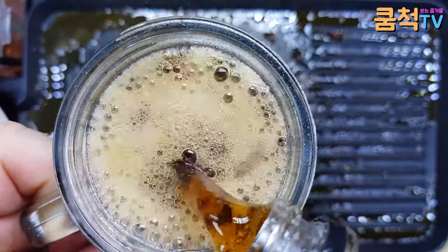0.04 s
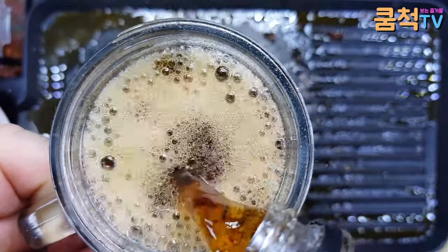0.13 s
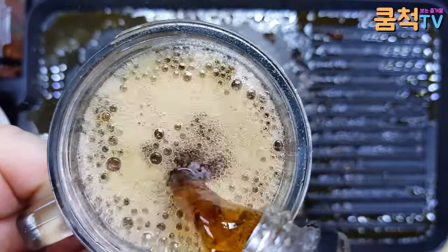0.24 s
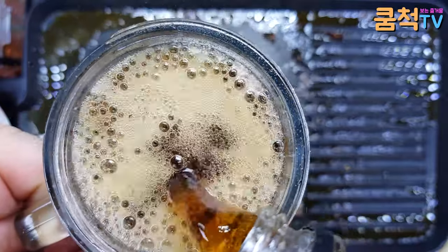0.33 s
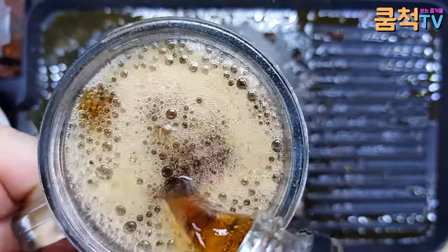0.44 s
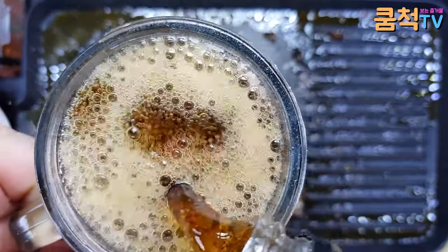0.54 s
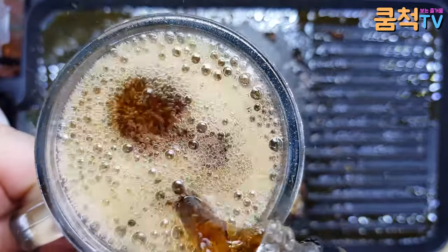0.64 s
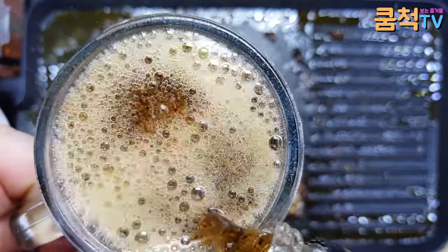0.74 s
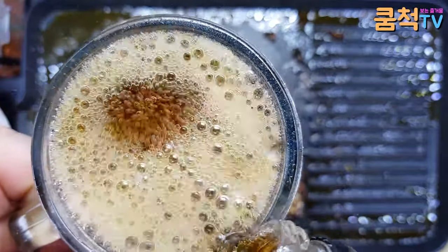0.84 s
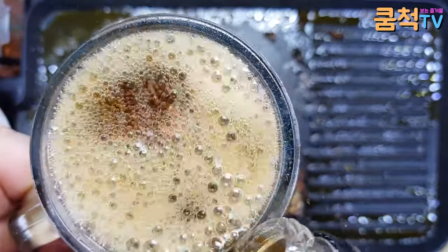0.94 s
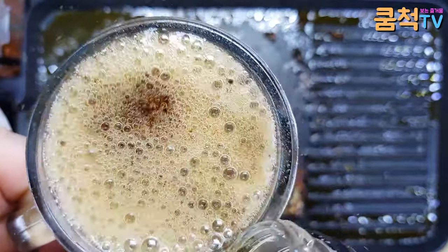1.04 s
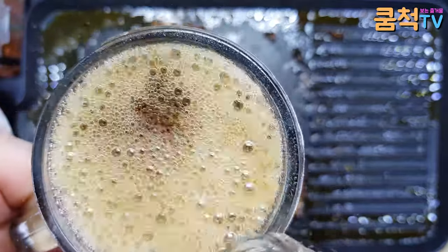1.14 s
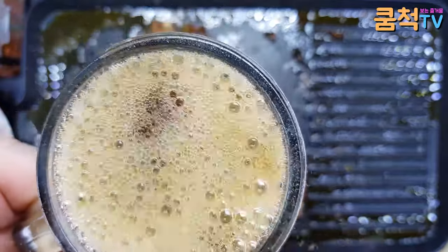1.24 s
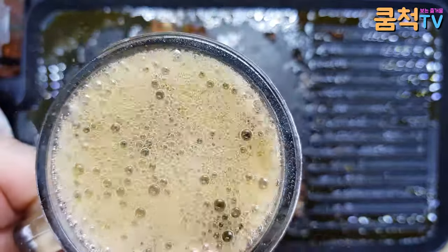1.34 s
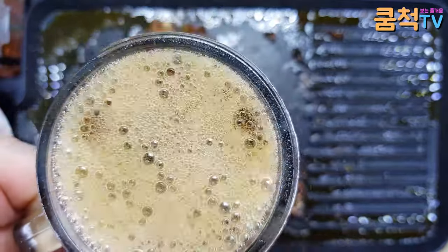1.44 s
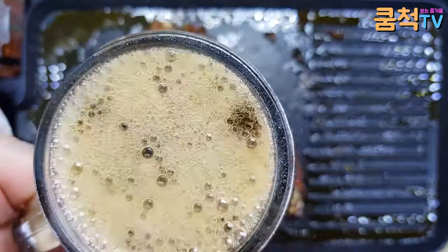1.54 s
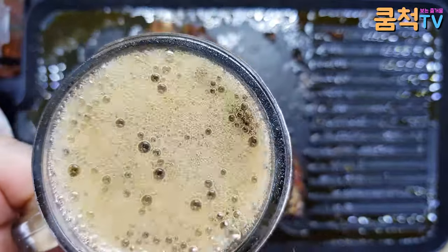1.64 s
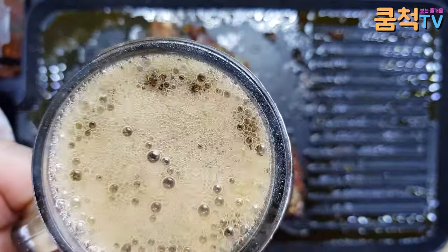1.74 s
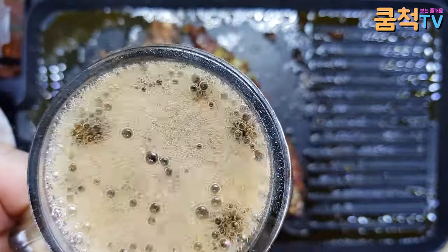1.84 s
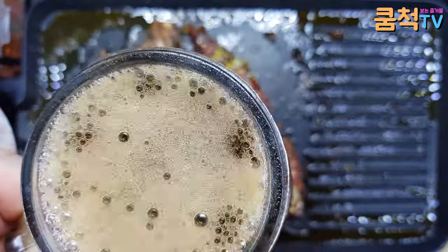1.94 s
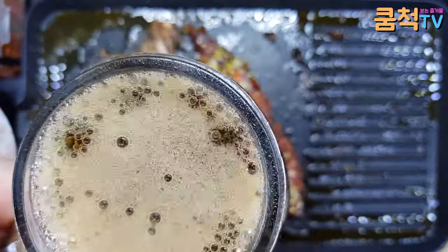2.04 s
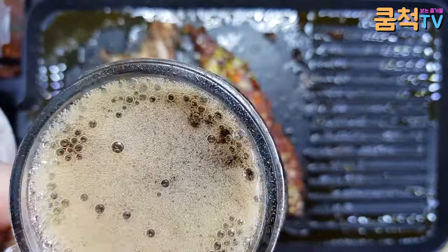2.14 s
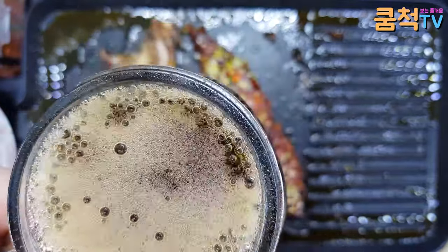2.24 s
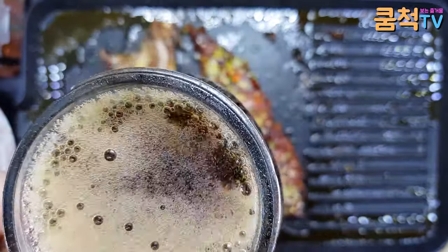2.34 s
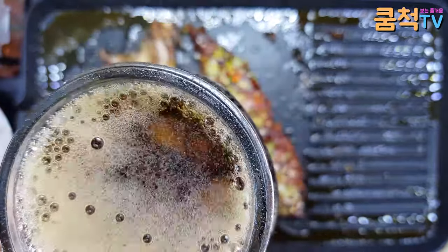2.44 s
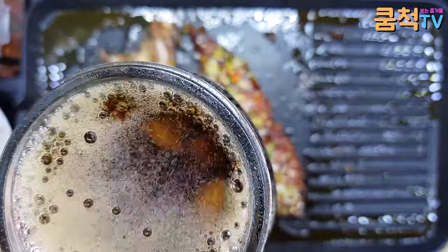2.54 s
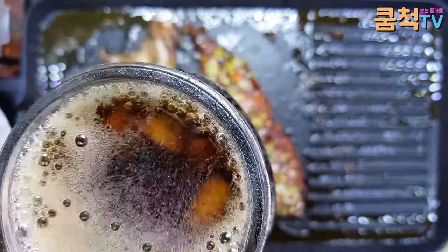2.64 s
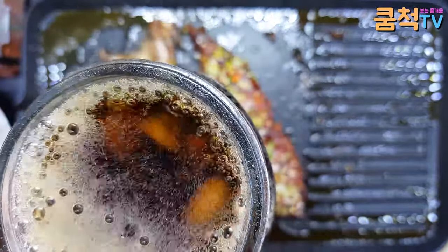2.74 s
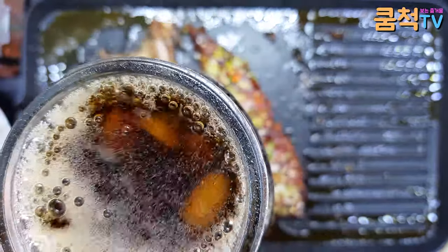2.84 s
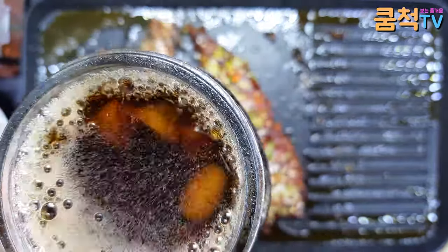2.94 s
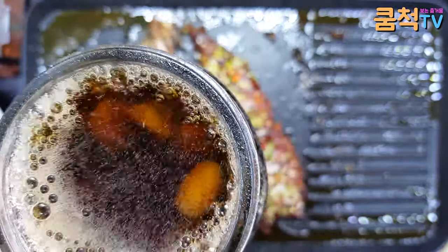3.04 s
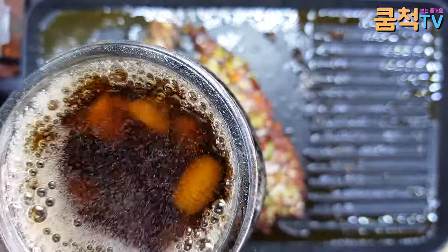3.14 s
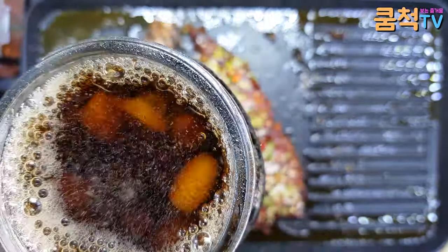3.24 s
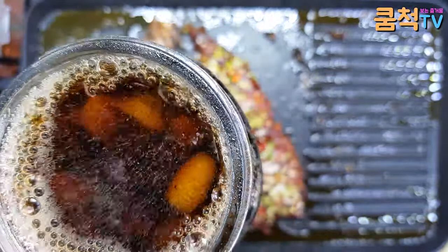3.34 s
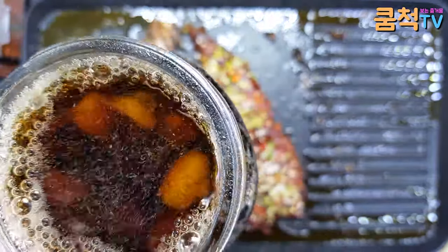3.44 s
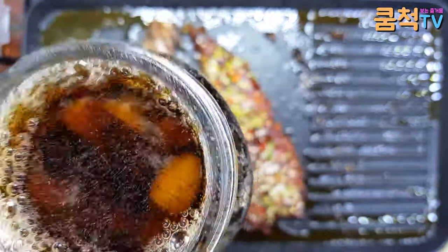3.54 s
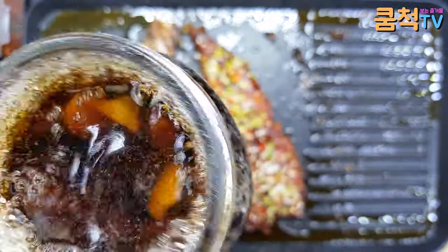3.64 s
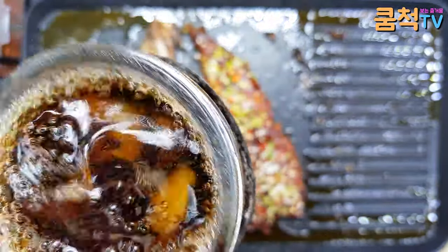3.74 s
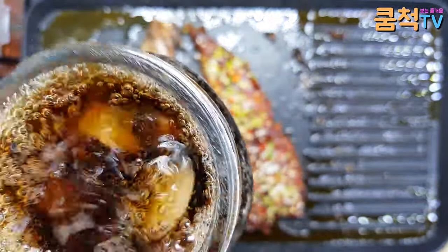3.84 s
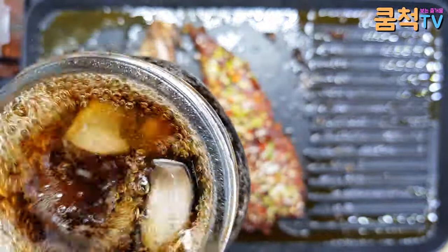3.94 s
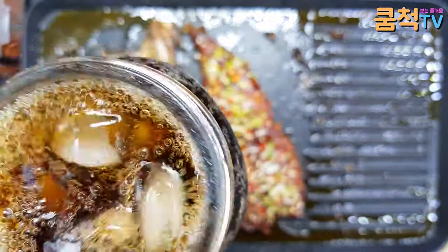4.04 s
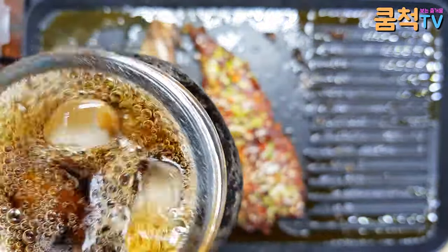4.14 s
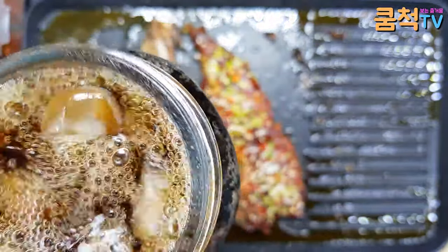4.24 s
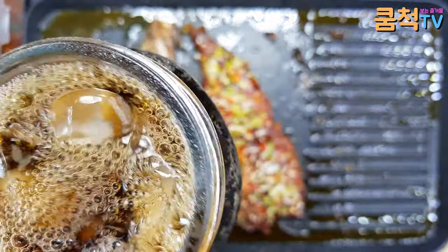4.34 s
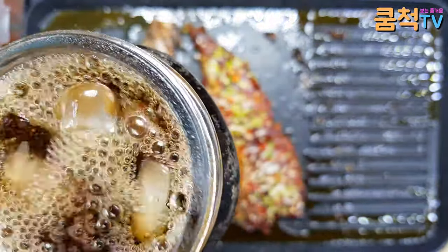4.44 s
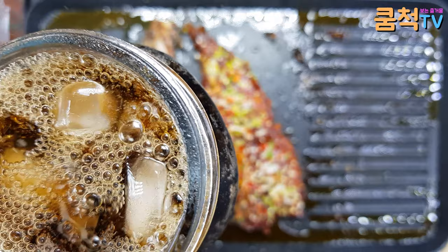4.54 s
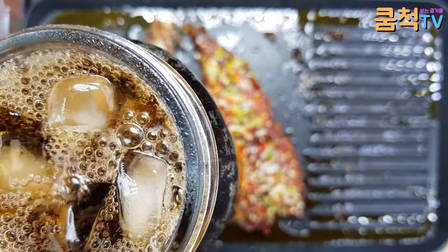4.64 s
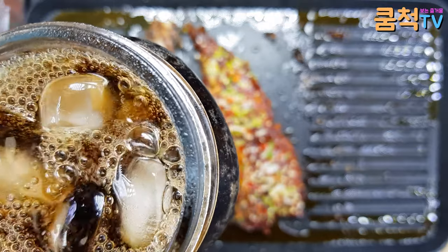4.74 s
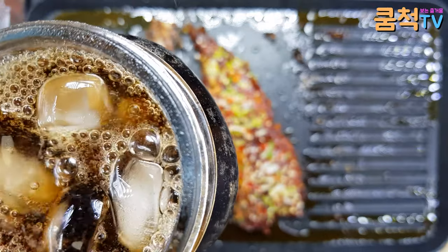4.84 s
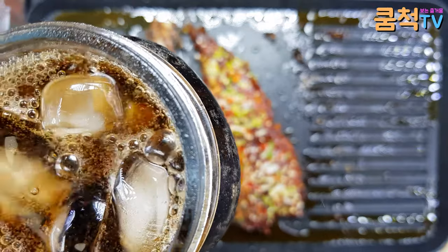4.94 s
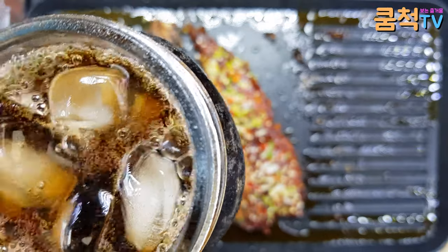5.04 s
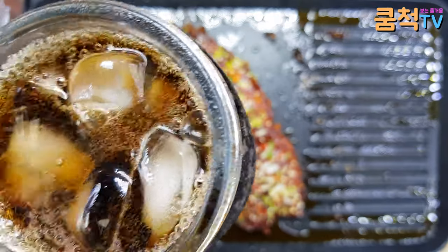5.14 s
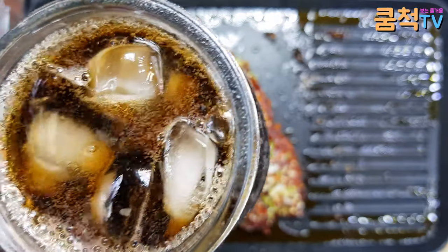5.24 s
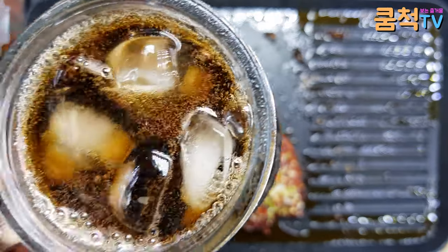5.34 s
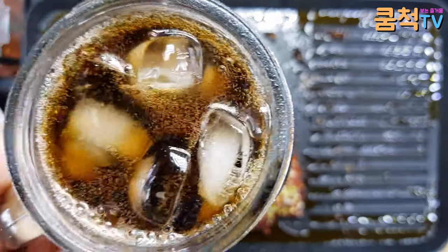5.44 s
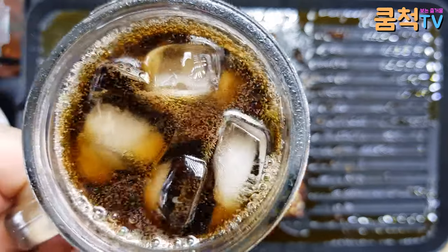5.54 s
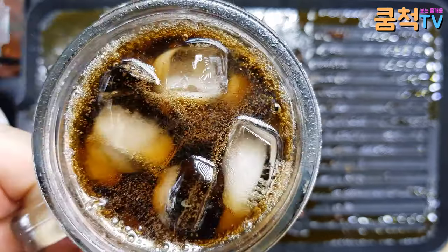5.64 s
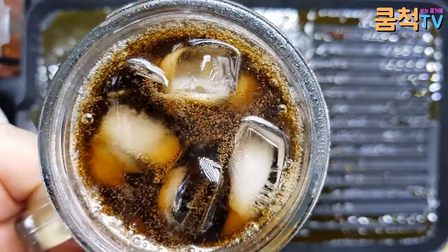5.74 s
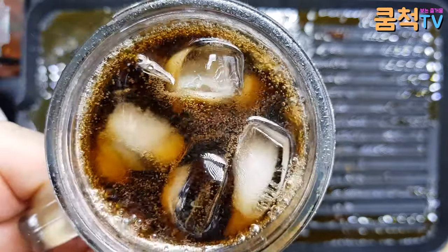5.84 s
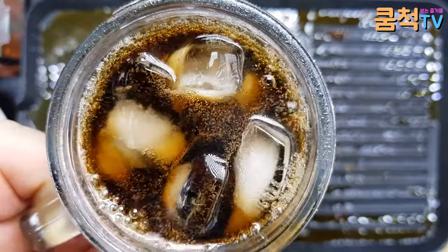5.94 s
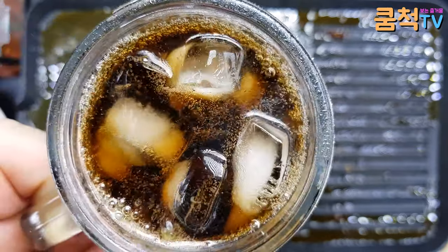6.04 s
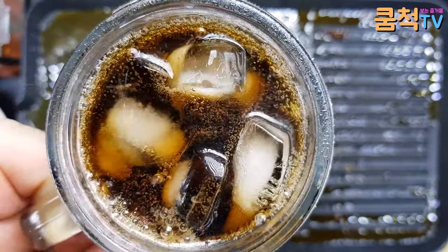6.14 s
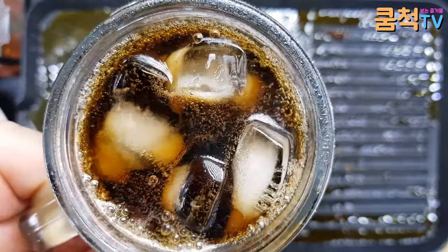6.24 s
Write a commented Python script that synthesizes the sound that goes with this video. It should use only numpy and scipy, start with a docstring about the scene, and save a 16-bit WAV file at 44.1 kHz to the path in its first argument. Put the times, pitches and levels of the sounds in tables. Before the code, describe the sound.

Fizzy soda foam hisses close up, a bottle knocks the glass rim, then a second pour gurgles and splashes while fat sizzles on a grill behind.

```python
"""Soda foams in a glass of ice close to the microphone: dense fields of bubbles over noise, tuned by the air column.
A second pour gurgles in later as noise in the hollows of the drink and ringing bubbles.
The emptied plastic bottle knocks the rim three times, ringing its air and its wall; dull thuds follow.
Behind it fat sizzles and spits on a grill, noise with sharp clicks and puffs.
Farthest back lies the low hum of the room: wavering tones over a rumble."""
import sys
import numpy as np
from scipy import signal
from scipy.fft import rfft, irfft, next_fast_len
from scipy.io import wavfile
from scipy.ndimage import uniform_filter1d, map_coordinates

SR = 44100
rng = np.random.default_rng(int(sys.argv[2]) if len(sys.argv) > 2 else 0)


def wrap_up_sound(samples):
    """Save the sound to the file named by the first command line argument, as 16-bit audio."""
    columns = np.atleast_2d(samples).T
    # keep every value between -1 and 1, then stretch to whole-number steps
    tamed = np.clip(columns, -1, 1)
    steps = np.round(tamed * 32767).astype(np.int16)
    wavfile.write(sys.argv[1], SR, steps)


N = 277389
T = np.arange(N) / SR

# All levels below are settings; flutter, fades and filters act on top of them.
# Spectrum of the foam: [f/Hz, relative level/dB per Hz]
FOAM_SPECTRUM = [(530, -23.5), (900, -18.5), (1980, -7), (2210, -11), (2460, -4), (3860, 1), (13600, -31.5),
                 (16000, -47)]
# The foam swells after each pour and collapses: [t/s, level/dB]
FOAM_LEVEL = [(0, -37), (.45, -38), (1.15, -40.5), (1.7, -38.5), (2.15, -36.5), (2.5, -42), (2.9, -46.5),
              (3.4, -58), (4.05, -51), (4.15, -39), (4.45, -45.5), (4.75, -60), (6.29, -65)]
# The smallest bubbles, ticking in the top octave: [t/s, level/dB]
TICK_LEVEL = [(0, -49), (1.22, -58), (1.3, -45.5), (1.9, -46.5), (2.2, -56), (2.7, -51), (3.6, -55),
              (4.3, -59), (5.6, -55), (5.85, -67.5), (6.25, -54)]
# Lift, or dip, at the resonance of the air above the drink: [t/s, lift/dB]
COLUMN_LIFT = [(0, -0.5), (1.1, -0.5), (2.1, 2.5), (2.7, 5.5), (3.2, -4), (4.2, 5.5), (5.15, 4), (5.4, -5)]
# The second pour: [t/s, gurgle level/dB, splash level/dB]
POUR_LEVELS = [(3.56, -79, -56), (3.65, -37, -40), (3.75, -46, -48.5), (4.04, -46, -41.5),
               (4.12, -39, -39.5), (4.43, -46.5, -47.5), (4.5, -48, -49)]
# Hollows of the drink among the ice: [f/Hz, width/Hz, level/dB]
HOLLOWS = [(505, 35, 1.5), (724, 107, 3.5), (1316, 100, 2), (190, 27, 7.5), (2030, 1300, -12)]
# Single clear bubbles of the second pour, small high ones and deep gulps: [t/s, level/dB, f/Hz]
PLINKS = [(3.646, -28, 750), (3.646, -24, 2840), (3.688, -15, 2940), (3.688, -20, 1170), (3.718, -22, 1190),
          (3.723, -20.5, 2870), (3.8151, -15, 2470), (3.8847, -19.5, 2730), (3.897, -25, 740),
          (3.936, -22.5, 2580), (3.8955, -26, 2800), (4.04, -25.5, 2520), (4.099, -19, 1490),
          (4.199, -22, 1140), (4.264, -23, 2960), (4.2558, -11.5, 2950), (4.289, -21, 1280),
          (4.29, -14.5, 3700), (4.3182, -16.5, 3150), (4.32, -29.5, 800), (4.384, -12, 2760),
          (4.384, -21, 1240), (4.445, -24, 3730), (4.442, -26, 1130)]
# Bottle against the rim, the first blow with a rebound:
# [t/s, blow level/dB, air ring level/dB, wall ring level/dB, wall f/Hz, wall glide/(Hz per s)]
KNOCKS = [(0.6736, -11.5, -13.5, -23.5, 965, -40), (.681, 0.5, -17, -44.5, 983, -40),
          (0.8261, -13, -21, -40.5, 953, -250), (1.043, -14.5, -33.5, -40, 980, 895)]
# Modes of the bottle wall: [multiple of the wall pitch, level/dB, time to fall 60 dB/s]
WALL_MODES = [(1, 3, 0.2), (1.9, -2.5, 0.15), (.55, 2.5, 0.021), (1.58, 9, 0.017), (4.05, 8.5, 0.023),
              (4.8, 7, 0.011), (6.3, -5, 0.017)]
# Glass and hand shift: [t/s, level before the fade/dB, f/Hz]
THUDS = [(3.265, -33, 119), (3.9, -36.5, 88), (4.384, -32, 62.5)]
# Single bursts of spitting fat and foam: [t/s, peak level/dB, f/Hz]
POPS = [(0.3347, -14.5, 4700), (.6288, -19.5, 4000), (0.7125, -16.5, 2780), (0.75, -18.5, 4070),
        (.9481, -22.5, 2800), (1.0269, -20.5, 2050), (1.282, -16.5, 3700), (1.466, -14.5, 4600),
        (1.6007, -21, 3380), (1.7398, -16.5, 4660), (1.8308, -18, 3730), (2.033, -25, 2430),
        (2.5412, -9, 3600), (2.6437, -11.5, 3570), (2.728, -20, 2680), (2.868, -25.5, 3430),
        (2.921, -21.5, 3450), (2.9877, -24, 7300), (3.007, -18, 5430), (3.1395, -24, 8500),
        (3.1802, -13, 3830), (3.1968, -21, 5500), (3.208, -16.5, 5510), (3.2464, -18, 2730),
        (3.2878, -18, 5960), (3.313, -22.5, 2730), (3.364, -16, 3460), (3.4627, -24.5, 2580),
        (3.56, -12.5, 3200), (3.5674, -11.5, 2840), (3.6673, -14, 3170), (3.6968, -13.5, 2800),
        (4.0991, -2.5, 5440), (4.1058, -18, 3760), (4.1516, -14.5, 3470), (4.4092, -12.5, 2520),
        (4.5475, -15.5, 5850), (4.5993, -13, 3160), (4.8805, -20.5, 4540), (5.0306, -17, 5230),
        (5.1276, -19, 3530), (5.2169, -18, 2820), (5.2517, -19.5, 5330), (5.3163, -23, 4400),
        (5.3376, -14.5, 2900), (5.5981, -17, 5950), (5.701, -15, 5030), (5.7159, -20, 6860),
        (5.9936, -15, 4900), (6.2619, -23, 2520)]
# Spectrum of the grill: [f/Hz, relative level/dB per Hz]
SIZZLE_SPECTRUM = [(180, -42), (300, -2), (405, -28), (681, -5), (1020, -21.5), (2470, 0.5), (6630, 4.5),
                   (11100, -10), (15300, -63)]
# Course of the grill: [t/s, level/dB]
SIZZLE_LEVEL = [(0, -44), (.5, -42.5), (2.5, -39.5), (3.4, -43.5), (4.1, -43), (4.6, -40.5), (5.2, -43.5),
                (5.8, -46), (6.29, -45)]
# Short hisses of steam squeezing out under the meat: [t/s, level before the fade/dB, f/Hz]
SQUEAKS = [(0.268, -29, 5000), (1.383, -29, 5960), (1.975, -32, 5940), (3.195, -21.5, 5460),
           (3.581, -21.5, 6000), (5.93, -34, 4640), (6.085, -28.5, 5670), (6.105, -26.5, 6100)]
# Spectrum of the room's rumble: [f/Hz, relative level/dB per Hz]
RUMBLE_SPECTRUM = [(20, -50), (34, 7), (91, -13), (124, -14), (200, -16.5), (304, -26.5), (1200, -27.5),
                   (1560, -24), (2640, -120)]
# Tones of the fan: [f/Hz, mean rms level/dB, size of the pitch waver/Hz]
HUM_TONES = [(38.7, -47, 1.13), (116.2, -56, 0.49), (60.1, -53.5, 1.33), (76.5, -55.5, 2.52)]

# Centre of the seething; it is 1 dB down SEETHE_FALL_S away, 4 dB at twice that
SEETHE_S, SEETHE_FALL_S = 2.11, .11
# The air above the drink rings with the fizz; its pitch climbs over FILL_S as the second pour fills the glass
COLUMN_HZ, FILLED_HZ, FILL_S = 3660, 4650, (3.1, 4.5)
# The lower ring is stronger while the first stream still runs
LOW_LIFT_DB, POUR_ENDS_S = 10, 1.0
# All plinks ring about equally long: time to fall 26 dB
PLINK_LIFE_S = 0.005
# The bottle's air note at the first knock; it rises as the neck clears
AIR_HZ, AIR_RISE_HZ_PER_S = 186.4, 103
THUD_T60_S = 0.31
# Resonance width at 6 kHz; higher squeaks are broader
SQUEAK_T60_S, SQUEAK_WIDTH_HZ, WIDER_PER_OCTAVE = 0.046, 1140, 6.5
TOP_HZ = 16000


def foam(surge):
    """Soda foam: noise and a dense field of tiny bursting bubbles, with one brief bright seething."""
    level_db, = curves(FOAM_LEVEL)
    bursts = crackle(count=5000, spread_db=4, life=.0006)
    bed = coloured(rng.standard_normal(N) + .7 * bursts, FOAM_SPECTRUM)
    fizz = bubbles(count=9000, hz=4000, octaves=.4, cycles=7, spread_db=3, size=200)
    head = amp(level_db + 0.29 * surge + 0.67 * wobble(40.08)) * (bed + 0.21 * fizz)
    # as the head of foam breaks up it seethes brightly for a moment
    seethe_db = -41.0 - ((T - SEETHE_S) / SEETHE_FALL_S) ** 2
    seethe = bubbles(count=20000, hz=4780, octaves=0.21, cycles=5.2, spread_db=1.5, size=96)
    return head + amp(seethe_db) * seethe


def ticks():
    """The smallest bubbles tick in clumps in the top octave, over a thin hiss."""
    level_db, = curves(TICK_LEVEL)
    field = bubbles(count=2500, hz=12500, octaves=.3, cycles=4, spread_db=6, size=64)
    clumps = field * amp(3.5 * wobble(18))
    thin = coloured(rng.standard_normal(N), [(8000, -14), (11500, -2.5), (14500, -3.5), (16200, -12)])
    return amp(level_db) * (0.37 * unit(clumps) + 0.2 * thin)


def air_column(x):
    """Air above the drink lifts or dips x at its moving resonance and at the one below it."""
    f, t, z = signal.stft(x, SR, nperseg=512)
    column_hz = np.interp(t, FILL_S, (COLUMN_HZ, FILLED_HZ))
    octaves = np.log2((f[:, None] + 1) / column_hz)
    lift_db = np.interp(t, *np.transpose(COLUMN_LIFT))
    low_db = 0.3 * lift_db + LOW_LIFT_DB / (1 + np.exp((t - POUR_ENDS_S) / 0.33))
    main_lift = lift_db * np.exp(-(octaves / 0.15) ** 2)
    low_lift = low_db * np.exp(-((octaves + 0.84) / 0.05) ** 2)
    return signal.istft(z * amp(main_lift + low_lift), SR, nperseg=512)[1][:N]


def pour():
    """The stream slaps unevenly into the hollows between the ice, traps bubbles there and splashes in small ones."""
    gurgle_db, splash_db = curves(POUR_LEVELS, left=-120, right=-120)
    slaps = unit(filtered(crackle(count=1800, spread_db=7, life=0.0017), hollows))
    large = bubbles(count=1600, hz=882, octaves=0.43, cycles=7.8, spread_db=7.0, size=900)
    small = bubbles(count=5000, hz=2920, octaves=0.29, cycles=6.7, spread_db=12.0, size=600)
    churn = coloured(crackle(count=1500, spread_db=6, life=0.0035),
                     [(1500, -34), (2500, 2.0), (3200, -1), (4500, -26), (7000, -30)])
    gurgle = amp(gurgle_db) * (0.78 * slaps + 0.5 * large)
    splash = amp(splash_db) * (small + 0.9 * churn)
    # foam over the drink swallows the top
    return low_passed(gurgle + splash + plinks(), 5500)


def plinks():
    """Each clear bubble is born in a slap of liquid and shivers while it rings."""
    s, db, hz = columns(PLINKS)
    size = 2048
    noise = uniform_filter1d(rng.standard_normal((len(PLINKS), 2, size)), size=4).swapaxes(0, 1)
    birth, shiver = noise
    slap = 1.6 * np.diff(uniform_filter1d(birth, size=3), prepend=0)
    slap = slap * np.exp(-np.arange(size) / (0.00083 * SR))
    ring = rings(hz, hz * PLINK_LIFE_S, size=size) * (1 + 0.44 * shiver)
    return placed(s[:, 0], amp(db) * (ring + slap))


def hollows(f):
    """Response of the drink's low resonances together, with alternating sign."""
    return sum((-1) ** k * amp(db) * resonance(f, hz, width) for k, (hz, width, db) in enumerate(HOLLOWS))


def bottle():
    """Knocks on the rim ring the air in the bottle (a long low note) and its stiff wall."""
    first_s, first_db = KNOCKS[0][:2]
    air_turns = np.cumsum(AIR_HZ + AIR_RISE_HZ_PER_S * (T - first_s)) / SR
    out, t = np.zeros(N), np.arange(SR // 2) / SR
    for s, db, air_db, wall_db, hz, glide in KNOCKS:
        i = round(s * SR)
        turns = air_turns[i:i + len(t)] - air_turns[i]
        air_fade = amp(air_db - 60 * t / 0.37) * (1 + 0.46 * np.exp(-t / 0.0044))
        air = air_fade * (1 - np.exp(-t / 0.0027)) * np.sin(2 * np.pi * turns)
        wall = np.zeros(len(t))
        for k, level, t60 in WALL_MODES:
            # softer blows wake less of the upper modes
            mode_db = wall_db + level + 0.63 * (db - first_db) * np.log2(k)
            wall += amp(mode_db - 60 * t / t60) * np.sin(2 * np.pi * k * (hz + glide * t / 2) * t)
        # the contact: one swing, harder with the wall ring, then a dull rattle falling 60 dB in 45 ms
        crack = np.sin(2 * np.pi * 3900 * t) * np.exp(-t / 0.00008) * amp(1.7 * (wall_db + 22.5) + 4.5)
        rattle = uniform_filter1d(rng.standard_normal(len(t)), size=14) * amp(-6 - 60 * t / .045)
        out[i:i + len(t)] += air + wall + crack + amp(db) * rattle
    # plastic on glass has little above this
    return low_passed(out, 7500)


def thuds():
    """Glass and hand shift: dull, broad bumps of low resonant noise."""
    s, db, hz = columns(THUDS)
    return puffs(s, db, hz, 1.08 * hz, THUD_T60_S, rise=0.003)


def pops():
    """Each burst is a sharp click and a short puff, coloured by its own cavity, with a little body below."""
    s, db, hz = columns(POPS)
    t, f = np.arange(2048) / SR, np.fft.rfftfreq(4096, 1 / SR)
    fade = amp(-60 * t / 0.01) + 0.28 * amp(-60 * t / 0.12)
    burst = 0.13 * rng.standard_normal((len(POPS), len(t))) * fade
    burst[:, 0] += 1  # the click
    # louder bursts come from larger pockets and are duller
    soft_top = 1 / (1 + 1j * f / (9500 * amp(-.12 * (db - 14.5)))) ** 6
    cavity = resonance(f, hz, 0.98 * hz) + 0.017 * resonance(f, 540, 1800)
    pop = irfft(rfft(burst, 4096) * cavity * soft_top)[:, :len(t)]
    return placed(s[:, 0], amp(db) * pop / abs(pop).max(axis=1, keepdims=True))


def sizzle(surge):
    """Fat on the grill: steady noise with crackling and sharper spits."""
    level_db, = curves(SIZZLE_LEVEL)
    spits = bubbles(count=1700, hz=4460, octaves=0.98, cycles=1.6, spread_db=8.5, size=128)
    fat = rng.standard_normal(N) + .5 * crackle(count=1300, spread_db=10.0, life=0.0022) + .38 * spits
    return amp(level_db + 0.91 * surge + 0.93 * wobble(30)) * coloured(fat, SIZZLE_SPECTRUM)


def squeaks():
    """Steam squeezes out under the meat in short hisses of resonant noise."""
    s, db, hz = columns(SQUEAKS)
    width = SQUEAK_WIDTH_HZ * WIDER_PER_OCTAVE ** np.log2(hz / 6000)
    return puffs(s, db, hz, width, SQUEAK_T60_S, rise=0.0003)


def room():
    """Low rumble of coloured noise and the hum of a fan, unsteady in level and pitch."""
    hum = np.zeros(N)
    for hz, db, waver in HUM_TONES:
        level = amp(db + 2.5 * wobble(12)) * np.sqrt(2)
        hum += level * np.sin(2 * np.pi * np.cumsum(hz + waver * wobble(12)) / SR)
    return hum + amp(-47 + 0.58 * wobble(3.04)) * coloured(rng.standard_normal(N), RUMBLE_SPECTRUM)


def rings(hz, cycles, size):
    """Bubbles: damped sines that start softly and rise a little in pitch, 26 dB down after the given cycles."""
    turns = hz * np.arange(size) / SR
    tone = np.sin(2 * np.pi * turns * (1 + 0.013 * turns / cycles))
    return tone * np.exp(-3 * turns / cycles) * (1 - np.exp(-turns / 0.32))


def bubbles(count, hz, octaves, cycles, spread_db, size):
    """A field of bubbles, random in time, pitch and strength, at rms 1."""
    at, tone = rng.random(count), rng.standard_normal((count, 1))
    big = rng.exponential(size=(count, 1))
    field = amp(spread_db * np.minimum(big, 3)) * rings(hz * 2 ** (octaves * tone), cycles, size)
    return unit(placed(at * N / SR, field))


def crackle(count, spread_db, life):
    """Noise at rms 1 whose level jumps at count random bursts and decays with time constant life in seconds."""
    at, size = rng.random(count), rng.exponential(size=count)
    starts = np.bincount((at * N).astype(int), amp(spread_db * np.minimum(size, 3.5)), N)
    envelope = signal.lfilter([1], [1, -np.exp(-1 / (life * SR))], starts)
    return unit(envelope * rng.standard_normal(N))


def puffs(s, db, hz, width, t60, rise):
    """Bursts of noise, each passed twice through its resonance, that rise fast and die away."""
    t, f = np.arange(8192) / SR, np.fft.rfftfreq(16384, 1 / SR)
    noise = irfft(rfft(rng.standard_normal((len(s), 16384))) * resonance(f, hz, width) ** 2)[:, :len(t)]
    noise /= noise.std(axis=1, keepdims=True)
    return placed(s[:, 0], amp(db - 60 * t / t60) * (1 - np.exp(-t / rise)) * noise)


def resonance(f, hz, width):
    """Response of one resonance at the frequencies f."""
    return 1j * f * width / (hz * hz - f * f + 1j * f * width)


def filtered(x, response):
    """x through a response given as a function of frequency in Hz."""
    m = next_fast_len(N + 8192)
    return irfft(rfft(x, m) * response(np.fft.rfftfreq(m, 1 / SR)), m)[..., :N]


def coloured(x, points):
    """x through (f/Hz, level/dB) points read on a log frequency axis, at rms 1."""
    hz, db = np.transpose(points)
    return unit(filtered(x, lambda f: amp(np.interp(np.log(f + 1), np.log(hz + 1), db))))


def low_passed(x, hz):
    """x with the treble above hz rolled off at 18 dB per octave."""
    return signal.sosfilt(signal.butter(3, hz, fs=SR, output="sos"), x)


def placed(seconds, rows):
    """Rows of samples summed into the scene at their start times."""
    at = np.round(np.asarray(seconds) * SR).astype(int)[:, None] + np.arange(rows.shape[1])
    return np.bincount(at.ravel(), rows.ravel(), N + rows.shape[1] + SR)[:N]


def wobble(rate):
    """A smooth random curve, rate knots a second."""
    return map_coordinates(rng.standard_normal(int(N * rate / SR) + 4), [T * rate])


def curves(rows, **ends):
    """One value per sample for each column after the time."""
    s, *values = np.transpose(rows)
    return [np.interp(T, s, v, **ends) for v in values]


def columns(rows):
    """Each column of a table, upright, so that one row of samples grows from each event."""
    return np.transpose(rows)[:, :, None]


def amp(db):
    """Gain of a level in dB."""
    return 10 ** (np.asarray(db) / 20)


def unit(x):
    """x at rms 1."""
    return x / np.sqrt(np.mean(x ** 2) + 1e-20)


def scene():
    """All sources at one microphone; foam and sizzle share a surge in level and the glass's air column."""
    surge = wobble(14)
    hiss = air_column(foam(surge) + sizzle(surge))
    glass = ticks() + pour() + bottle() + thuds()
    return (hiss + glass + pops() + squeaks() + room())[None]


def record(dry):
    """Peaks stop at full scale, then everything from the band limit up is removed."""
    return filtered(np.clip(dry, -1, 1), lambda f: f < TOP_HZ)


dry = scene()
out = record(dry)
wrap_up_sound(out)
```